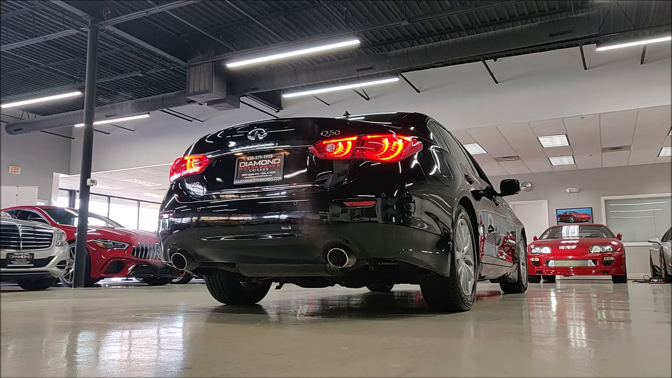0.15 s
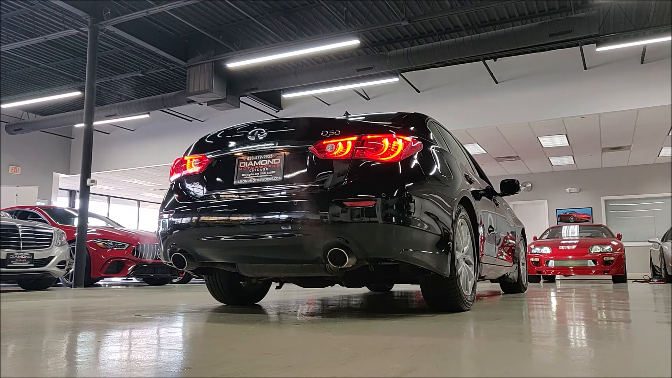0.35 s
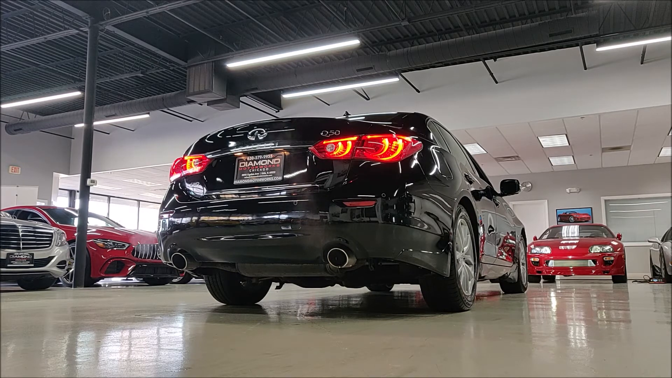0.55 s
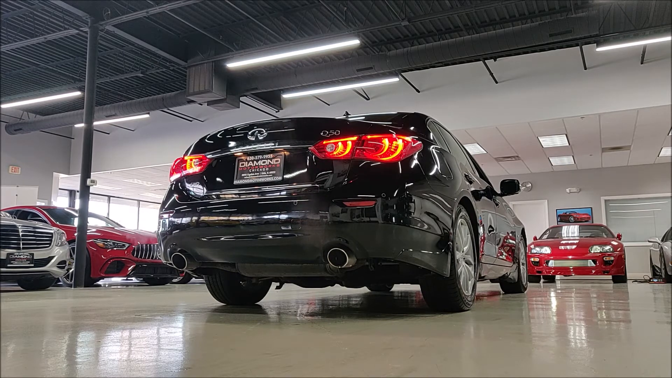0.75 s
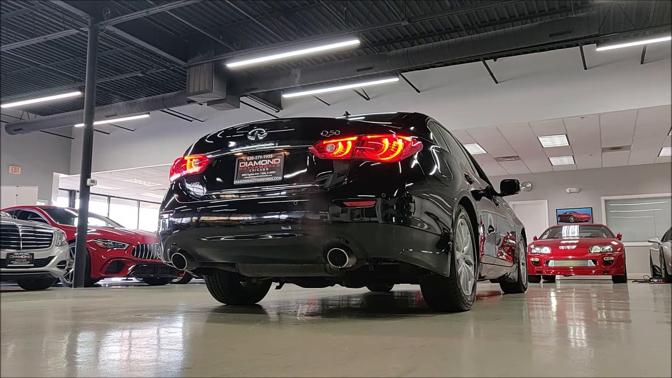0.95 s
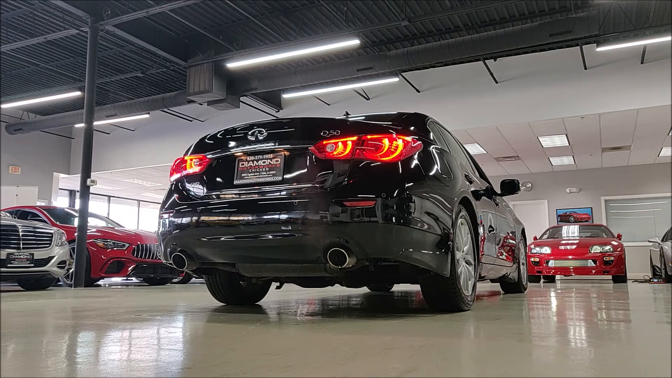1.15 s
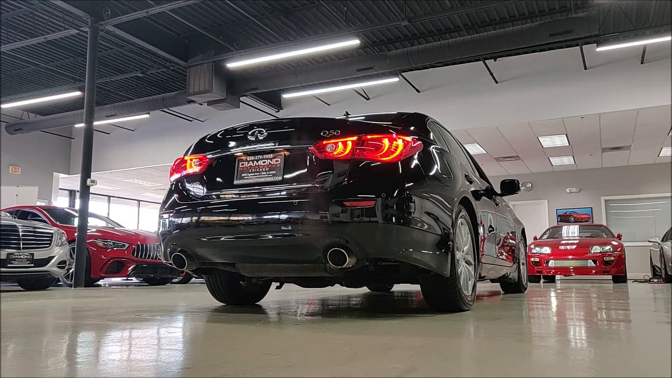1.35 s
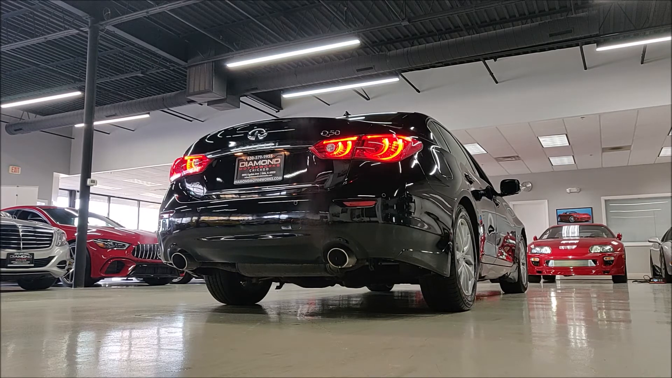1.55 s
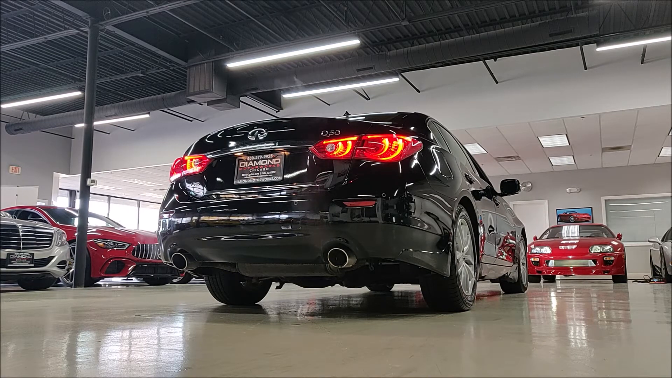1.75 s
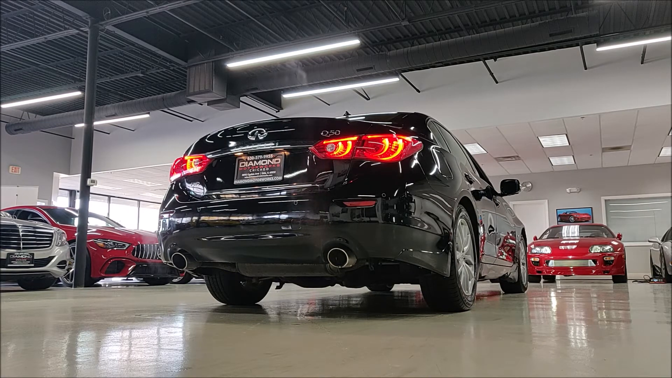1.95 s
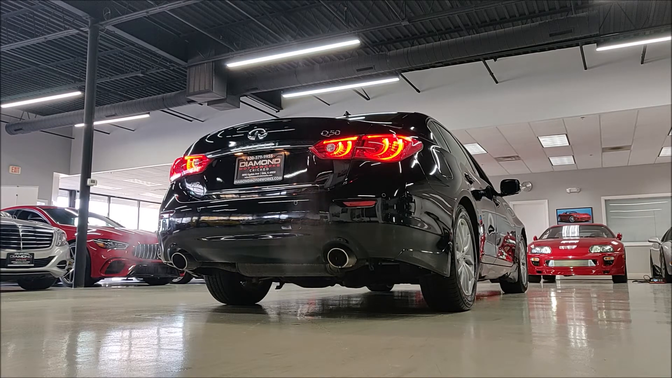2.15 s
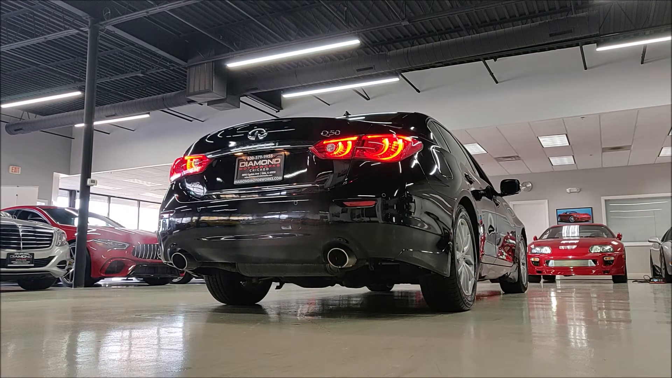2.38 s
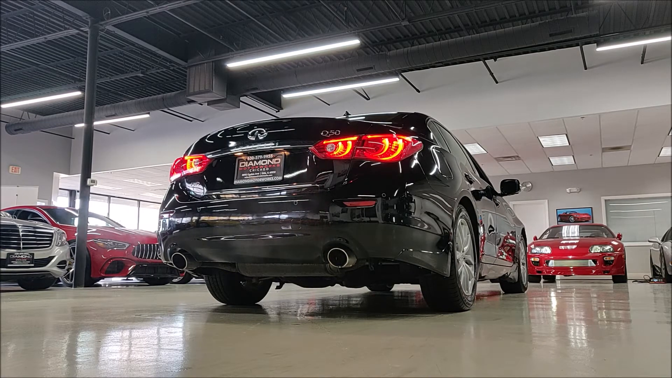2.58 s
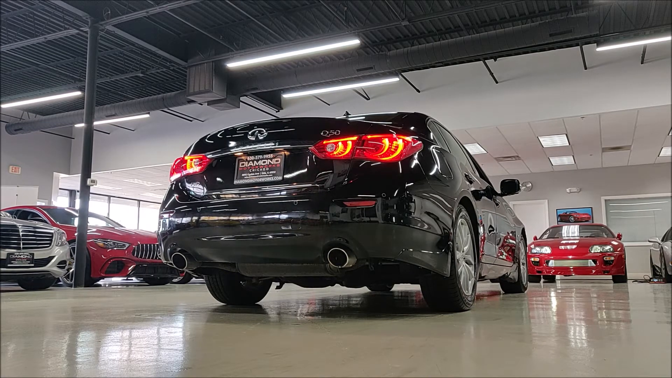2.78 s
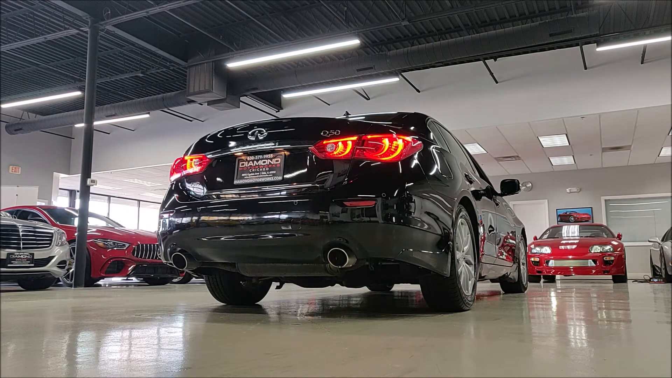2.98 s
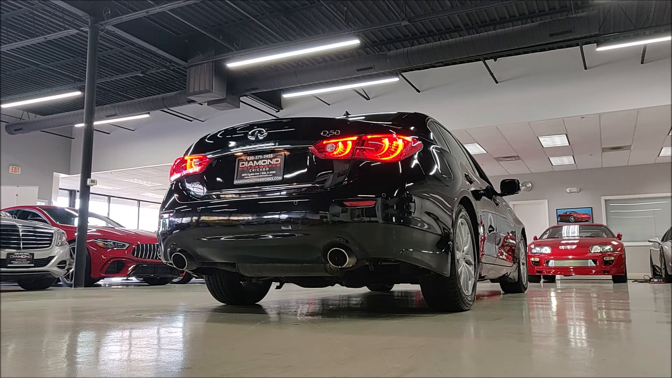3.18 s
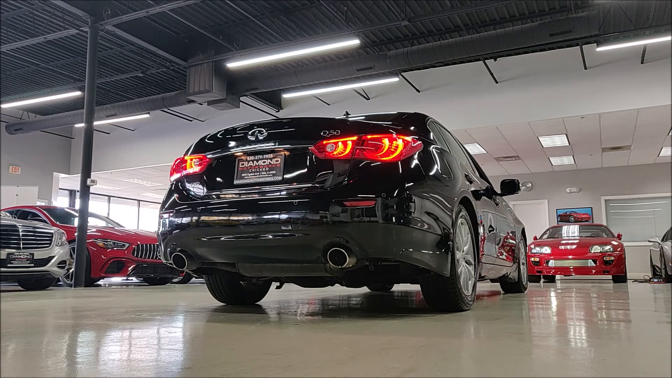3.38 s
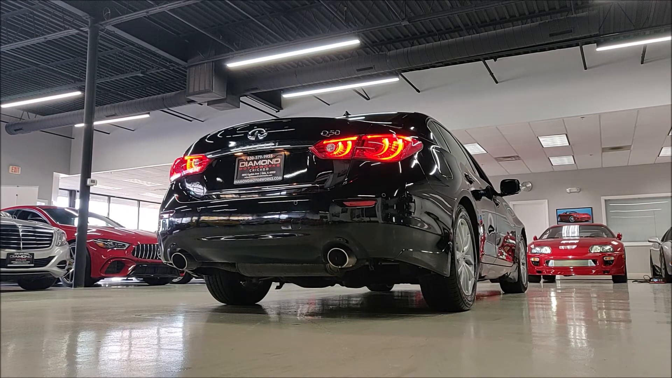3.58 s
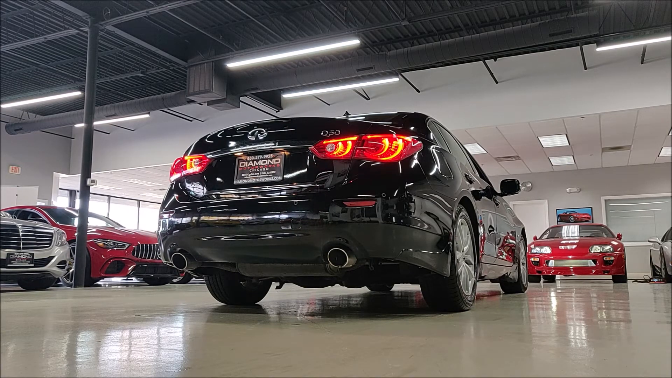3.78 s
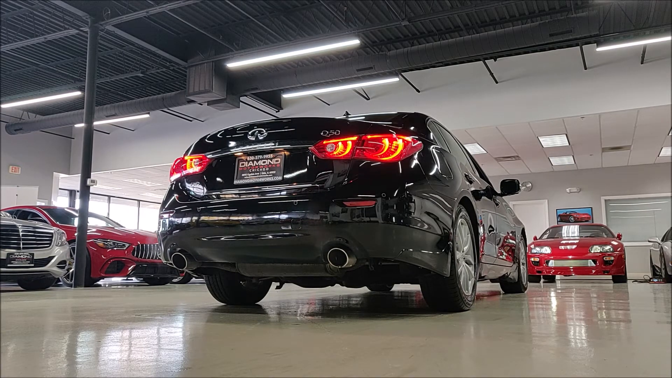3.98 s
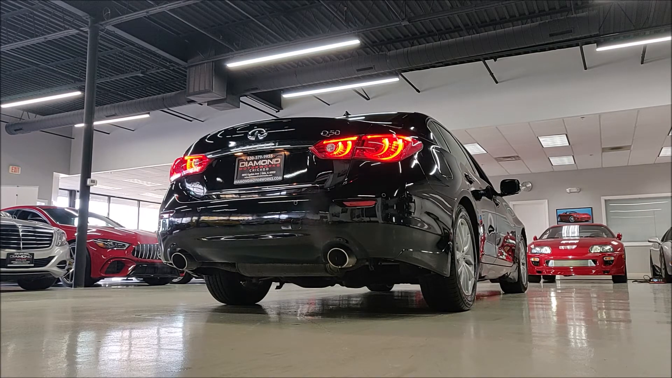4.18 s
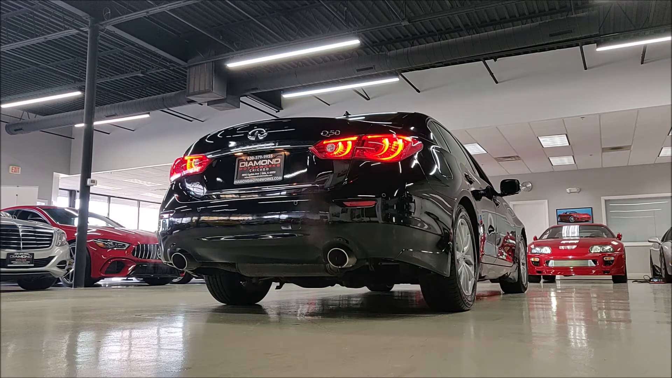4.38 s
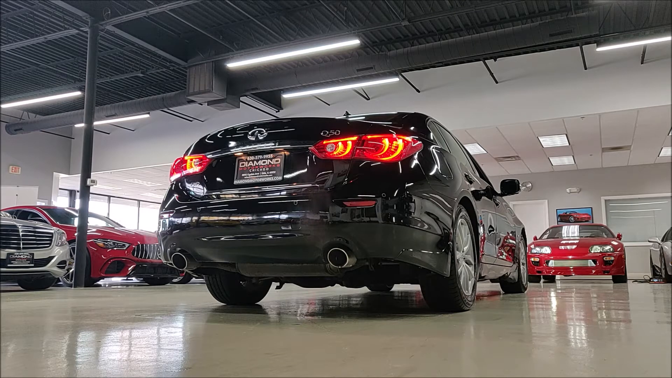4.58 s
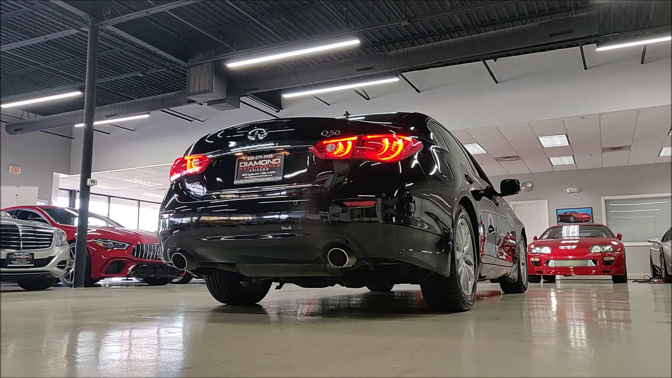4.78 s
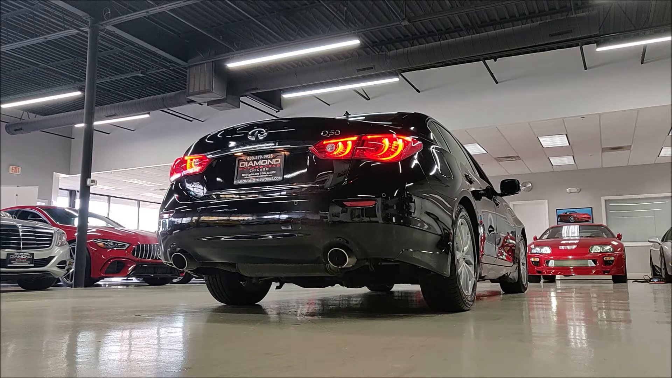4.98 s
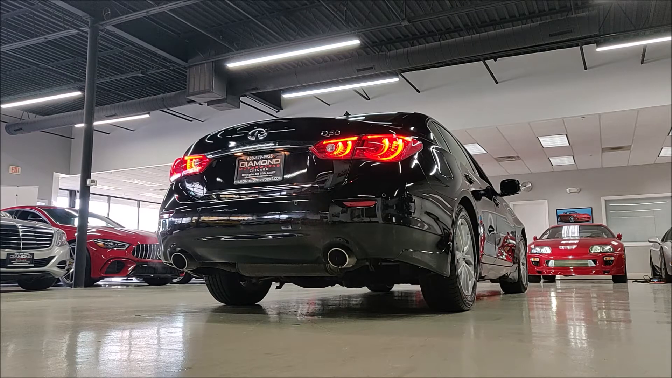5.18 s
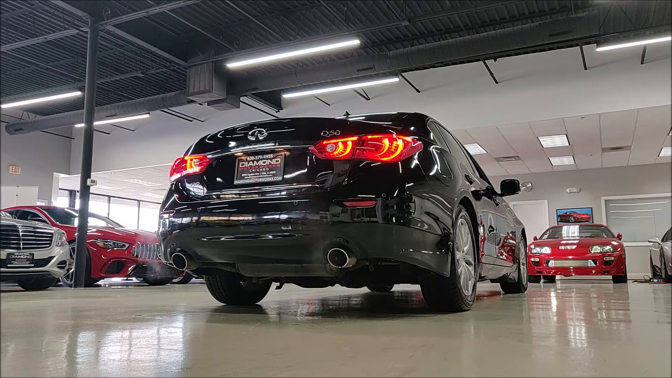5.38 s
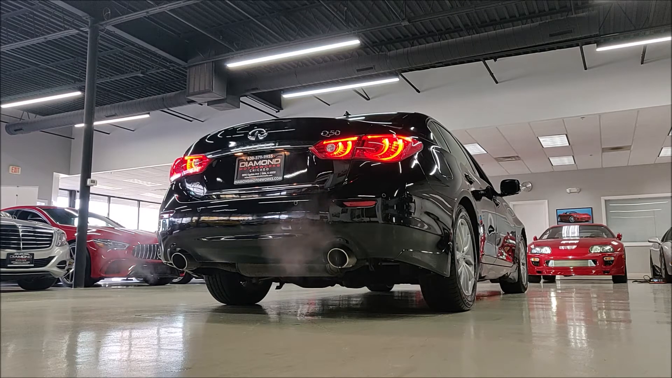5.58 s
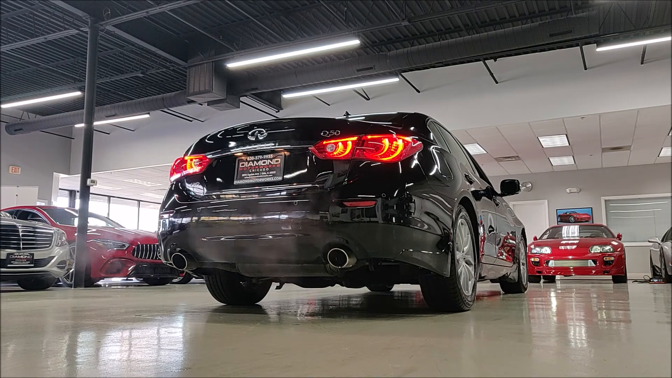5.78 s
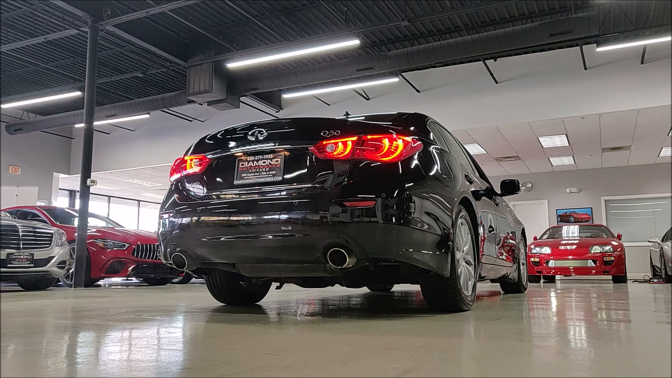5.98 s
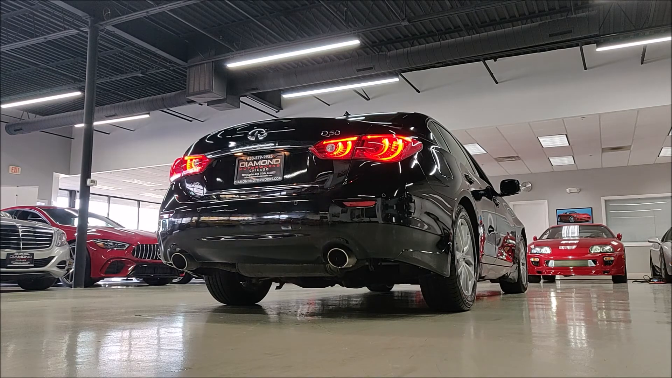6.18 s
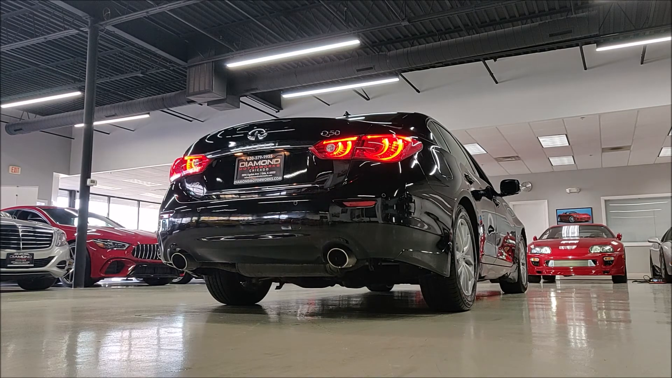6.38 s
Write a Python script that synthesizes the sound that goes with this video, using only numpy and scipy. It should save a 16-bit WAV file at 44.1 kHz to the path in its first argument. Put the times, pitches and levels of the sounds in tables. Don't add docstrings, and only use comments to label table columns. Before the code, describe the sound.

A stereo microphone near the tailpipes hears a quiet, bassy idle with broad fan and belt noise. The engine blips sharply, booms and rasps, then burbles and pops as revs drop. It sinks back to a low throb, and a stronger rev surges to a hard metallic roar, easing slightly before the cut, with short hard-room echoes around the exhaust.

```python
import sys
import numpy as np
from scipy import signal
from scipy.io import wavfile
from scipy.ndimage import uniform_filter1d

SR = 44100
rng = np.random.default_rng(int(sys.argv[2]) if len(sys.argv) > 2 else 0)


def output_pcm(signal):
    pcm = np.clip(np.atleast_2d(signal).T, -1, 1) * 32767
    wavfile.write(sys.argv[1], SR, np.round(pcm).astype(np.int16))


def volts(x):
    e = np.asarray(x, float) / 20
    return 10 ** e


N = 283989


def evened(x):
    return x / np.sqrt(np.mean(x ** 2) + 1e-20)


def steadied(x, seconds):
    return x / np.sqrt(abs(uniform_filter1d(x ** 2, int(seconds * SR))) + 1e-20)


def read(points, hz):
    f, value = np.transpose(points)
    return np.interp(np.log(hz + 1), np.log(f + 1), value)


def played(rows, t):
    s, *columns = np.transpose(rows)
    return [np.interp(t, s, column) for column in columns]


def ringing(x, modes, order=1):
    out = np.zeros(len(x))
    for k, (hz, width, db) in enumerate(modes):
        pole = np.exp((2j * np.pi * hz - np.pi * width) / SR)
        y = x
        for _ in range(order):
            y = signal.lfilter([1 - abs(pole)], [1, -pole], y)
        out += (-1) ** k * volts(db) * y.real
    return out


# t/s, firing rate f/Hz
FIRING_RATE = [(0.0, 39.63), (1.76, 36), (1.88, 37.06), (1.96, 45.57), (2.1, 67.6), (2.19, 74.47),
               (2.37, 93.87), (2.64, 92), (2.8, 88.06), (3.21, 59.47), (3.51, 53.73), (4.11, 50.72),
               (4.73, 34.91), (5.29, 42.1), (5.45, 62.58), (5.7, 136.1), (5.87, 148.6), (6.44, 114)]


def firing_rate(t):
    return played(FIRING_RATE, t)[0]


def octaves(t):
    return np.log2(firing_rate(t) / FIRING_RATE[1][1])


# pedal down t/s, held t/s, intake gulp [0-1]
BLIPS = [
    (1.91, 0.22, 1.01),
    (5.31, 0.38, 0.65),
]


def throttle(t, open_s, gulp=0):
    shut_s = 0.077
    total = 0
    for s, held, depth in BLIPS:
        opening = np.clip((t - s) / open_s, 0, 1)
        closing = np.exp(-np.maximum(t - s - held, 0) / shut_s)
        total = total + depth ** gulp * opening * closing
    return total


def stamp(t):
    return throttle(t, open_s=0.059)


# t/s, firing pressure level/dB, tailpipe jet level/dB, evenness of the six firings level/dB
GAS = [(0.0, 2, 0, 0), (1.88, -1, -1.5, -1.5), (1.96, 13.5, 5.5, -3), (2.05, 16, 21, 5),
       (2.13, 16, 28, 1.5), (2.25, 14, 22, 9), (2.5, 9, 10, -5), (2.85, 12.5, 11, -2), (3.1, 4.5, 9, 0),
       (3.25, 5.5, 3.5, -4), (5.26, 0, -3, 1), (5.35, 7.5, 5.5, 3.5), (5.45, 15, 23, 3.5),
       (5.58, 20, 40.5, 3.5), (5.71, 24.5, 37.5, 1), (5.82, 19, 30, 0.5), (5.89, 16.5, 27, -18),
       (6.44, 15.5, 18, -5.5)]


def exhaust_gas(t):
    return played(GAS, t)


ORDERS_DB = [-46.5, -47.5, -44, -49]
ORDER_SHARE = [0.87, 0.92, 0.65, 0.74]
# f/Hz, width f/Hz, level/dB
PIPE = [(54.4, 27.4, 2), (93.3, 20, 1), (113.3, 14, 0.5), (151, 41, 3.5), (207.6, 29.4, -0.5), (297, 34, 0),
        (347.5, 18, -2), (405, 23, -1), (553, 25, 1.5)]


def order_levels(t, hz):
    pressure_db, _, even_db = exhaust_gas(t)
    waver = uniform_filter1d(rng.standard_normal((N // 1000 + 2, 4)), size=5, axis=0)
    levels = []
    for k, (db, share) in enumerate(zip(ORDERS_DB, ORDER_SHARE)):
        through = sum(volts(gain_db) ** 2 / (1 + (2 * ((k + 1) * hz - f) / width) ** 2)
                      for f, width, gain_db in PIPE)
        if k == 0:
            lug_db = 12.5 - 6 * octaves(t)
            through = through * volts(lug_db * stamp(t)) ** 2
        waver_db = 3 * np.repeat(evened(waver[:, k]), repeats=1000)[:N]
        levels.append(db + share * pressure_db + even_db + 10 * np.log10(through) + waver_db)
    return levels


def orders(turns, levels_db):
    out = np.zeros(N)
    for k, db in enumerate(levels_db):
        strength = np.sqrt(2) * volts(uniform_filter1d(db, size=2600) - 3.5)
        phase = rng.uniform(0, 2 * np.pi)
        out += strength * np.cos(2 * np.pi * (k + 1) * turns + phase)
    return out


# idle level/dB, share of pressure, share of jet [dB per dB]
PARTS = [(-41, 1.08, 0.01), (-48, 0.16, 0.61), (-50.5, 0.01, 0.99), (-57, .05, 0.77)]


def gas(t):
    pressure_db, jet_db, _ = exhaust_gas(t)
    flare_db = pop_flare(t)
    pedal = stamp(t)
    lumpy = 0.68 + 0.26 * octaves(t) + (0.27 - 0.68) * pedal
    hot_db = -4 + (10 + 4) * pedal + 1.7 * flare_db
    levels_db = [db + a * pressure_db + b * (jet_db + flare_db) for db, a, b in PARTS]
    return np.clip(lumpy, 0, 1), hot_db, levels_db


# f/Hz, width f/Hz, level/dB
BOOM = [(39.5, 97, -11), (59.2, 4.7, -8), (91.8, 36, -1.5), (110.5, 85, -12), (156.5, 76, -2),
        (217.7, 25, -8.5)]
GROWL = [(290.4, 193, -8), (325, 42, -2.5), (357.8, 26.8, -1.5), (396, 60, -15.5), (433, 62, -10),
         (530, 14.5, -10.5)]
RING = [(540.5, 30, -7), (567.9, 14.3, -5.5), (613.5, 31, 1.5)]
HOT_RING = [(646.7, 19.5, 1.5), (686, 20.2, -13.5)]
RASP = [(767, 48, 3.5), (869, 64, 2), (959, 37, 1.5), (1057, 71, -12.5)]
HOT_RASP = [(1243.7, 32, 5.5), (1385, 64, -8)]


def puffs(t, turns):
    lumpy, hot_db, levels_db = gas(t)
    at = np.flatnonzero(np.diff(np.floor(turns)) > 0)
    size, late = rng.standard_normal((N // 200, 2))[:len(at)].T
    blows = np.zeros(N)
    when = np.clip(at + (0.0015 * SR * late).astype(int), 0, N - 1)
    blows[when] = 1 - lumpy[at] + 0.51 * lumpy[at] * size
    swirl = (2.7 + np.exp(-(turns % 1) / 0.48)) * rng.standard_normal(N)
    blows, swirl = steadied(blows, 0.45), evened(swirl)

    banks = [BOOM, GROWL, RING, HOT_RING, RASP, HOT_RASP]
    swirl_share = [0.68, 1.6, 1.39, 1.78, 1.3, 0.49]
    boom, growl, ring, hot_ring, rasp, hot_rasp = (
        ringing(blows + share * swirl, modes, order=2) for modes, share in zip(banks, swirl_share))
    ring = ring + volts(hot_db) * hot_ring
    rasp = rasp + volts(0.61 * hot_db) * hot_rasp

    trims_db, holds_s = [-7.5, -1.0, -3.0, -5.0], [0.1, 0.12, 0.095, 0.13]
    parts = zip([boom, growl, ring, rasp], levels_db, trims_db, holds_s)
    return sum(volts(db + trim_db) * steadied(x, hold_s) for x, db, trim_db, hold_s in parts)


# f/Hz, density level/dB per Hz
RUSH_IDLE = [(880, -33), (1500, 1), (1610, 3), (1750, -2.5), (1860, -3.5), (2130, -1), (2330, 2),
             (2620, 1.5), (3310, 4), (4440, -11), (4890, -9), (6500, -12.5), (8140, -26), (15100, -23.5),
             (15500, -21)]
# f/Hz, density level/dB per Hz
RUSH_REV = [(880, -33), (1500, 6), (1610, 3), (1860, 11.5), (2150, -13.5), (3410, -16), (4190, -2.5),
            (6440, 0), (7100, -2), (8140, -35), (13700, -58.5), (14800, -31), (15500, -63)]
# f/Hz, correlation [-1 to 1]
PORT_LIKENESS = [(60, 0.85), (150, 0.72), (380, 0.99), (950, 0.077), (2380, 0.14), (5980, 0.01),
                 (15000, -0.14)]


def rush(turns):
    frames, hz = N // 128 + 5, np.fft.rfftfreq(512, 1 / SR)
    a, b, c, d, patches = rng.standard_normal((frames, 257, 5)).T
    patches = uniform_filter1d(uniform_filter1d(patches, size=6, axis=0), size=24, axis=1)
    patches_db = 1.1 * evened(patches)
    t = np.arange(frames) * 128 / SR
    open_s = 0.19
    level_db = -58.5 + 9 * octaves(t) + 7.5 * throttle(t, open_s, 1)
    bright = 0.15 + 0.047 * octaves(t) + 0.12 * throttle(t, open_s, 0.87)

    idle_db, rev_db = (read(s, np.maximum(hz, 1500)) - read(s, 4300) for s in (RUSH_IDLE, RUSH_REV))
    colour_db = idle_db[:, None] + np.clip(bright, 0, 1) * (rev_db - idle_db)[:, None]
    band = (hz > 1600) & (hz < 7500)
    colour_db = colour_db - 10 * np.log10((volts(colour_db[band]) ** 2).sum(0))
    low_db = 5.9 * np.maximum(np.log2(1500 / (hz + 1)), 0)
    thin_db = np.minimum(10.3 * np.log2((hz + 1) / 800), 0)
    air_db = 6 * throttle(t, 2 * open_s, 1) * (hz > 7480)[:, None]

    same = np.clip(read(PORT_LIKENESS, hz), -1, 1)[:, None]
    left, other = a + 1j * b, c + 1j * d
    z = np.array([left, same * left + np.sqrt(1 - same ** 2) * other])
    z = z * volts(colour_db + (thin_db + low_db)[:, None] + level_db + air_db + patches_db + 3.0)
    noise = signal.istft(z, nperseg=512, noverlap=384)[1][:, :N]
    return noise * (1 + 0.066 * np.cos(2 * np.pi * turns))


# f/Hz, t60 t/s
HALL = [(60, 0.92), (300, 0.74), (1000, 0.47), (4000, 0.39)]
# f/Hz, level/dB
WIDTH = [(30, -64.5), (100, -32), (300, -15.5), (650, -16.5), (1250, -27), (2000, -3.5)]


def hall(x, wet_db):
    taps = np.zeros((2, SR))
    at = np.arange(300, SR - 20, 20) + rng.integers(0, 20, (2, (SR - 301) // 20))
    np.put_along_axis(taps, at, rng.choice([-1., 1.], at.shape), 1)
    hz, t, z = signal.stft(taps, SR, nperseg=512)
    decay = volts(-60 * t / read(HALL, hz)[:, None])
    z = z * decay * volts([wet_db + 0 * hz, read(WIDTH, hz)])[:, :, None]
    tails = signal.istft(z, SR, nperseg=512)[1] / np.sqrt(SR / 20 * 0.018)
    mid, side = signal.fftconvolve(x[None], tails, axes=1)[:, :N]
    return np.array([x + mid + side, x + mid - side])


# start t/s, length t/s, from f/Hz, to f/Hz, level/dB
NOTES = [(2.281, 0.18, 580, 555, -30.5), (2.6, 0.22, 580, 500, -40.5), (2.66, 0.32, 46, 41, -33),
         (2.9, 0.37, 150, 190, -38), (3.42, 0.44, 367.4, 400, -75.5), (3.805, 0.53, 460, 405, -52),
         (5.871, 0.266, 206, 216, -28.5), (5.979, 0.18, 66.6, 64.5, -31.5), (2.08, 0.24, 1242, 1217, -47.5),
         (6.2, 0.31, 370, 342, -26), (5.58, .2, 1255, 1240, -30.5), (5.6, 0.073, 1405, 1400, -33),
         (2.47, 0.24, 100, 92.4, -31), (6.1, .45, 132, 106, -28.5), (2.26, 0.1266, 350, 362, -29.5),
         (5.74, 0.13, 565, 572, -25), (5.93, 0.201, 578, 570, -28)]
# start t/s, length t/s, from f/Hz, to f/Hz, level/dB
WHINES = [
    (2.46, .36, 3500, 3120, -54.5),
    (2.97, .33, 3850, 3300, -58.5),
    (2.07, .11, 5000, 5020, -60),
    (5.49, .11, 5060, 5100, -51),
]
# f/Hz, fuzz [0-1]
FUZZ_BY_PITCH = [(400, .1), (1200, .35), (3800, .2), (5000, .75)]


def notes():
    out = np.zeros(N)
    for s, length, from_hz, to_hz, db in NOTES + WHINES:
        flutter = uniform_filter1d(uniform_filter1d(rng.standard_normal(SR), size=150), size=150)
        flutter = evened(flutter)
        start, count = int(s * SR), int(length * SR)
        i = np.arange(min(count, N - start))
        fuzz = read(FUZZ_BY_PITCH, from_hz)
        swell = signal.windows.tukey(count, 0.45)[i]
        strength = volts(db) * (1 - fuzz + fuzz * flutter[i]) * swell
        cycles = np.cumsum(from_hz + (to_hz - from_hz) * i / SR / length) / SR
        out[i + start] += np.sqrt(2) * strength * np.cos(2 * np.pi * cycles)
    return out


# t/s, peak level/dB, ring share level/dB
POPS = [
    (2.709, -25, -17),
    (2.894, -29, -24),
    (2.946, -24, 0.5),
    (2.958, -20, -2.5),
    (2.981, -41, -21),
    (3, -27, -13),
    (3.066, -34, -17),
    (3.075, -24.5, -31),
    (3.097, -26, -18),
]


def pop_flare(t):
    return 5 * sum(volts(ring_db) * np.exp(-((t - s) / 0.038) ** 2) for s, _, ring_db in POPS)


def pops():
    bump, ring = np.zeros((2, N))
    for s, db, ring_db in POPS:
        bump[int(s * SR)] = volts(db - 6.0)
        ring[int(s * SR)] = volts(db + ring_db)
    u = np.arange(800) / SR / 0.0043
    pulse = u * (2 - u) * np.exp(1 - u) / 0.91
    return signal.oaconvolve(bump, pulse)[:N] + 600 * ringing(ring, RING + HOT_RING, order=2)


def scene():
    t = np.arange(N) / SR
    hz = firing_rate(t)
    turns = np.cumsum(hz) / SR
    exhaust = orders(turns, order_levels(t, hz)) + notes() + puffs(t, turns) + pops()
    return hall(exhaust, wet_db=-12) + rush(turns)


def band_limit(x):
    return signal.sosfilt(signal.butter(12, 15660, fs=SR, output="sos"), x)


# f/Hz, left minus right level/dB
PORTS = [(200, 0.75), (1200, 0.4), (2300, -2), (3350, -9), (4200, -2), (5200, 1), (6000, 2.5), (6900, -2),
         (9000, -1.5)]


def record(dry):
    hiss = volts(-68) * rng.standard_normal(dry.shape)
    hz, t, z = signal.stft(dry + hiss, SR, nperseg=1024)
    tilt_db = read(PORTS, hz) / 2
    power = (abs(z) ** 2).sum(0)
    loud_db = 10 * np.log10(uniform_filter1d(power.sum(0), size=5) + 1e-12)
    top_hz = np.interp(loud_db, [-30, -28, -15], [16000, 15200, 14200])
    patch = uniform_filter1d(uniform_filter1d(power, size=5, axis=0), size=3, axis=1)
    neighbours = uniform_filter1d(patch, size=21, axis=0)
    weak_share = np.interp(loud_db, [-36, -22], [0.85, 0.62])
    weak = (patch < weak_share * neighbours) & (hz[:, None] > 4500)
    z = z * volts(np.array([tilt_db, -tilt_db]))[:, :, None] * (hz[:, None] < top_hz) * ~weak
    mix = signal.istft(z, SR, nperseg=1024)[1][:, :N]
    return band_limit(mix)


dry = scene()
out = record(dry)
output_pcm(out)
```